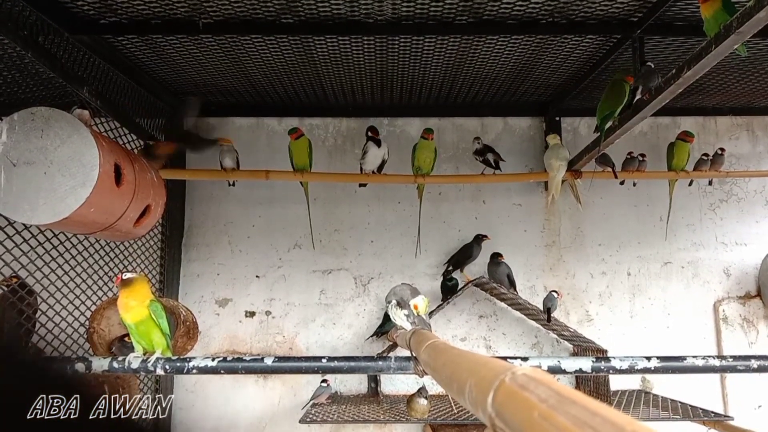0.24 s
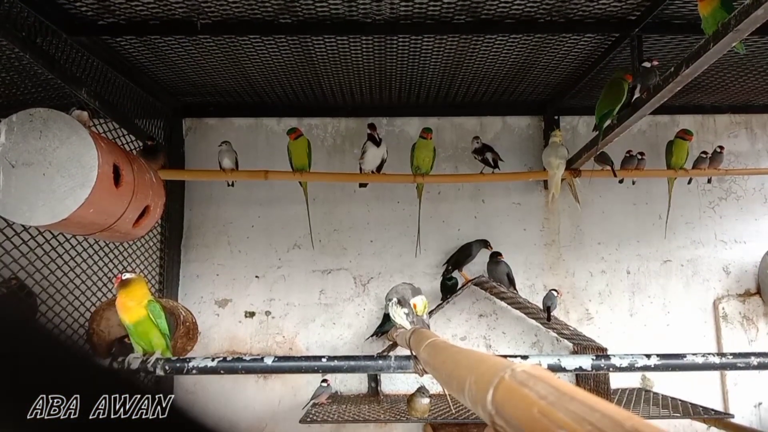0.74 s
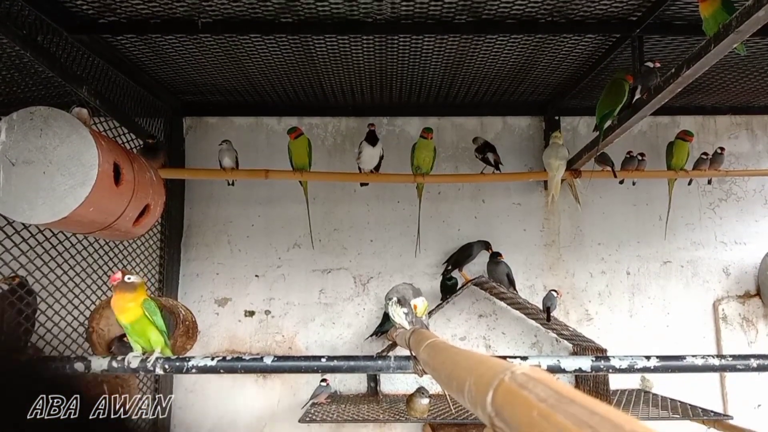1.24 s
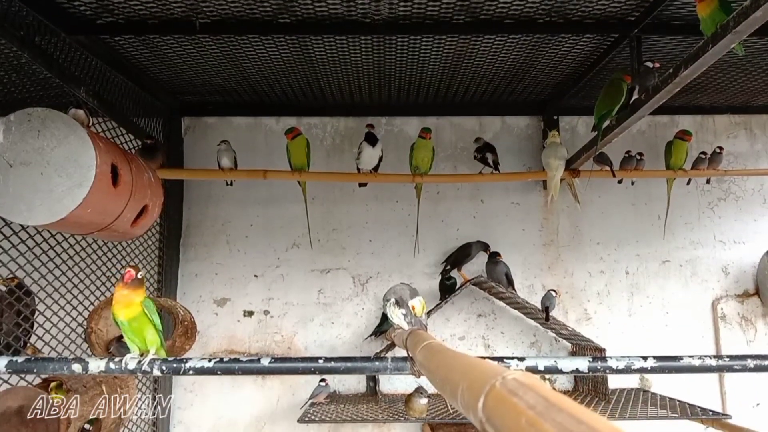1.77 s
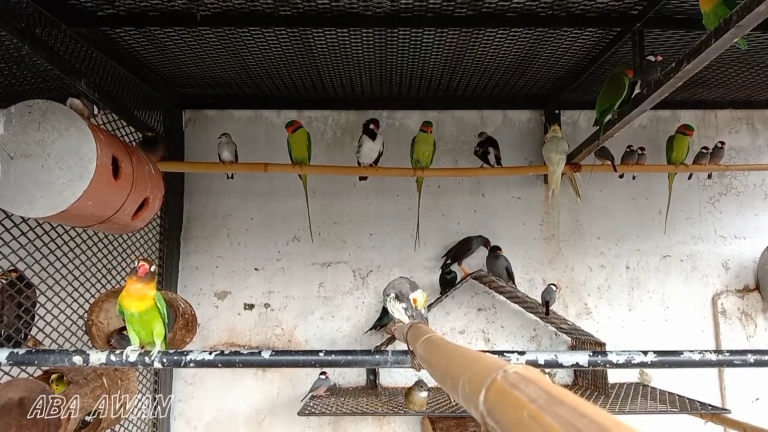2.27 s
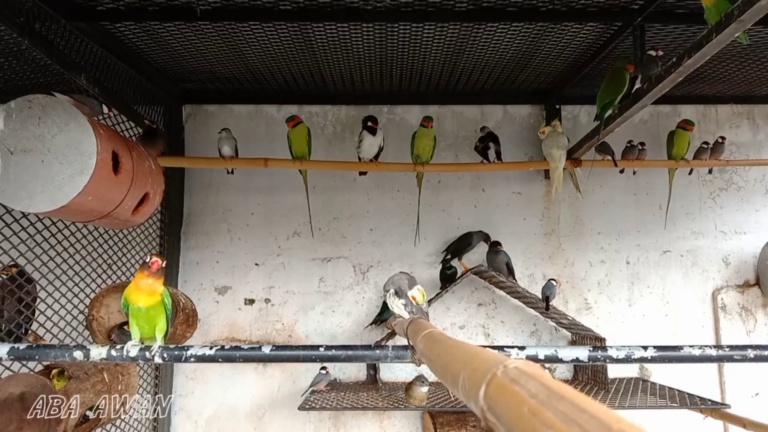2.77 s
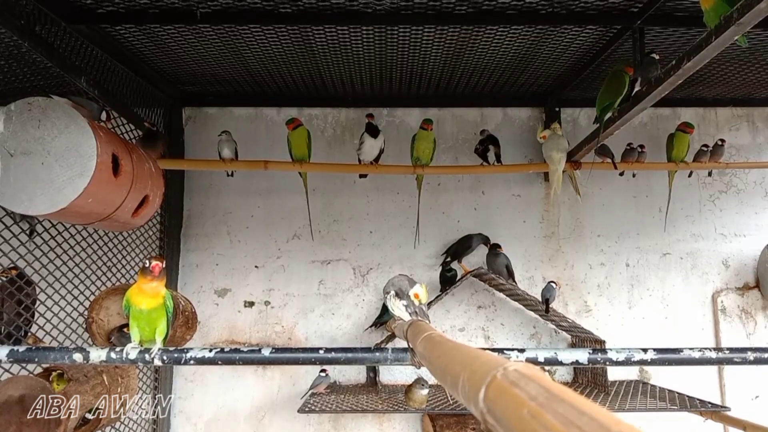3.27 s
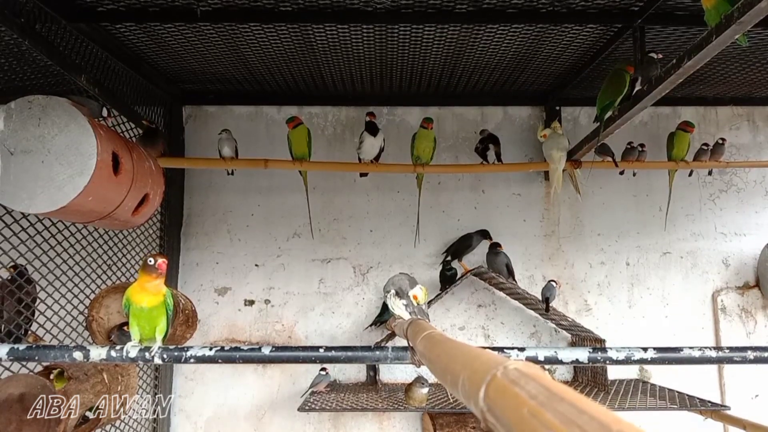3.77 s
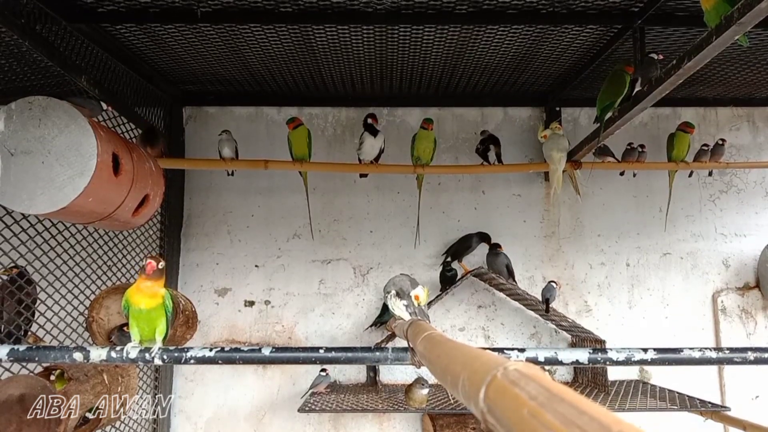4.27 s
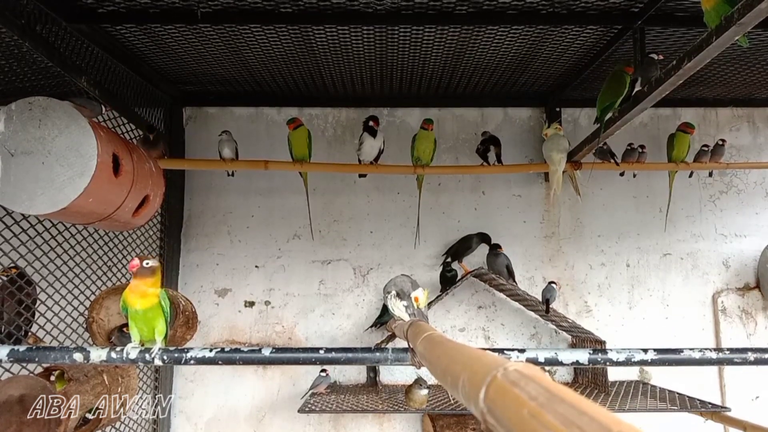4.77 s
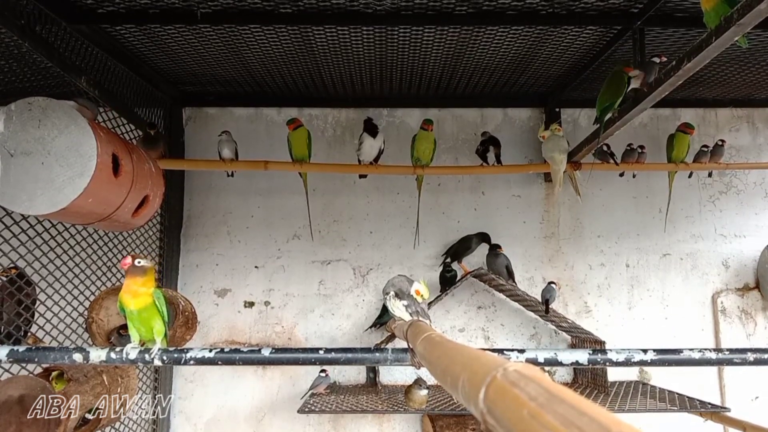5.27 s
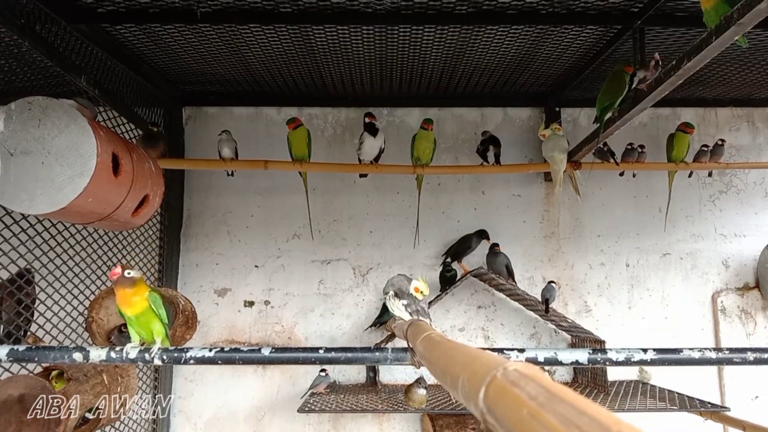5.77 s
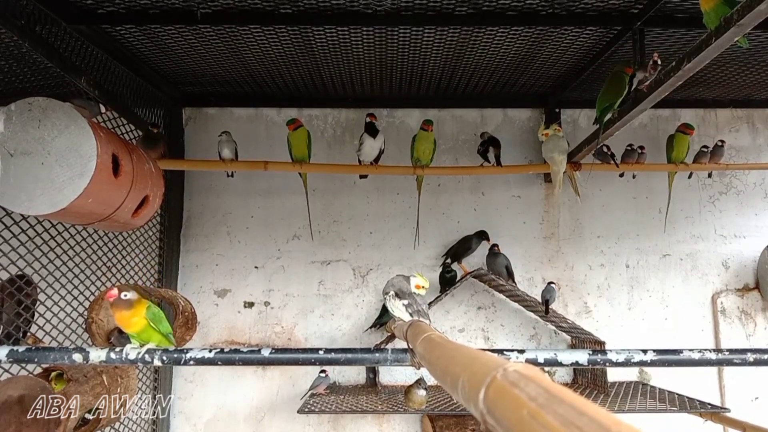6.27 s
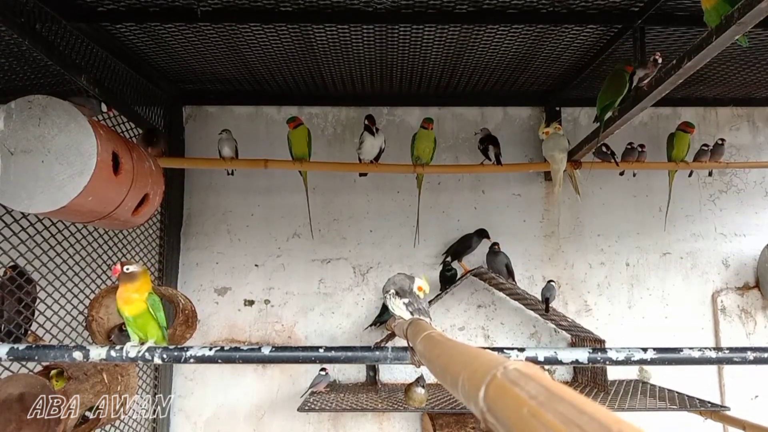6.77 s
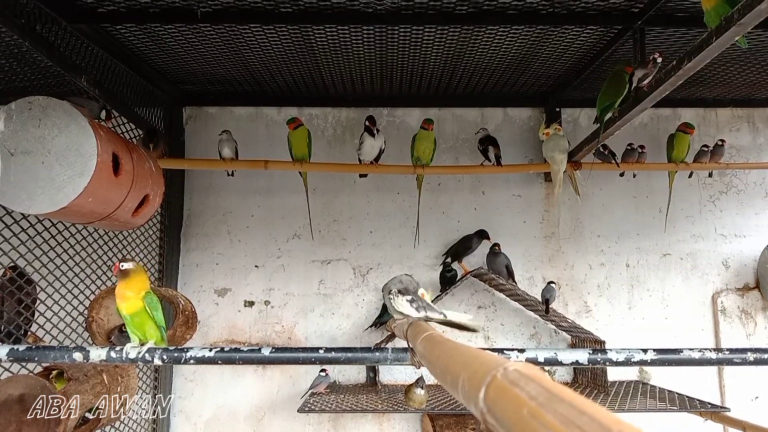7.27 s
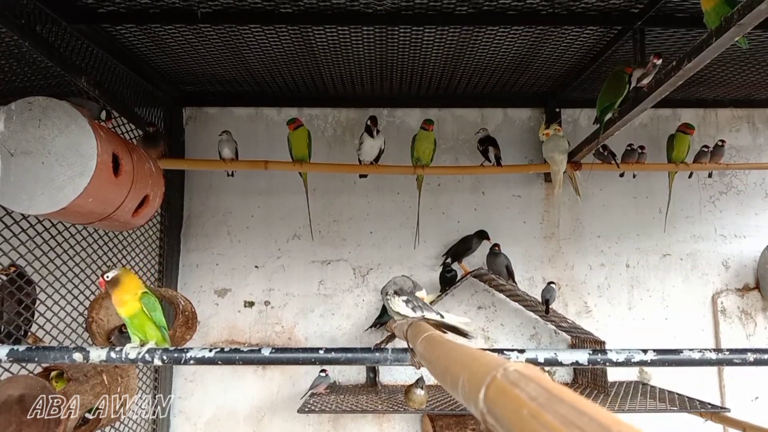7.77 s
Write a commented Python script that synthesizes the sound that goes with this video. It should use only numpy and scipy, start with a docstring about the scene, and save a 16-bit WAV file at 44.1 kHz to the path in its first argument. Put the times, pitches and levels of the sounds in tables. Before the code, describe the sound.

Small parrots and finches shriek, squawk and chip in a hard-walled aviary while one bird twice whistles a long rising and falling note.

```python
"""In a hard-walled aviary small parrots and finches call together: shrieks, squawks, quick chips and hisses.
One bird twice whistles a long note that rises and falls; others warble, muffled, and a dove coos faintly.
Voices are sums of unsteady harmonics weighted by a throat resonance; rasps, ticks and bumps are shaped noise.
Decaying noise serves as the walls' answer to every call, over a low outdoor rumble and a thin ringing tone."""
import sys
import numpy as np
from scipy import signal
from scipy.fft import rfft, irfft, next_fast_len
from scipy.io import wavfile
from scipy.ndimage import uniform_filter1d, minimum_filter1d, map_coordinates

SR = 44100
rng = np.random.default_rng(int(sys.argv[2]) if len(sys.argv) > 2 else 0)


def store_wav(level_fs):
    """Save 16-bit WAV to argv[1]."""
    pcm = np.round(np.clip(np.atleast_2d(level_fs), -1, 1) * 32767)
    wavfile.write(sys.argv[1], SR, pcm.T.astype(np.int16))


N = 354563
TOP_HZ = 15900  # upper band limit

# Throat resonances of the shrill, nasal and distant voices. Each row: frequency in Hz, relative gain in dB.
SHRILL_THROAT = [(1500, -20), (2600, -19.5), (3400, 0.5), (4300, -4.5), (5400, 2), (6400, -2.5),
                 (7800, -11.5), (10500, -15), (13000, -13), (16000, -23.5)]
NASAL_THROAT = [(1000, -11.5), (1600, -1.5), (2400, -2.5), (3300, 6), (4000, -6.5), (5000, 2), (6500, -2),
                (8500, -10), (11000, -14), (16000, -24)]
FAR_THROAT = [(700, 5.5), (3300, -4.5), (5300, -21), (8200, -36.5), (11000, -51.5), (16000, -55)]


def amp(db):
    """Level to amplitude: 20 dB is a factor of ten."""
    return 10 ** (np.asarray(db) / 20)


def unit(x):
    """Normalisation to a root-mean-square of 1."""
    return x / np.sqrt(np.mean(x ** 2) + 1e-20)


def along(points, hz):
    """Interpolation of (Hz, value) points on a logarithmic frequency axis."""
    f, v = np.transpose(points)
    return np.interp(np.log(hz + 1), np.log(f + 1), v)


def wobble(n, rate):
    """Slow random modulation: a smooth curve through Gaussian knots, rate of them a second."""
    knots = rng.standard_normal(int(n * rate / SR) + 4)
    return map_coordinates(knots, [np.arange(n) * rate / SR + 1])


def ease(u):
    """A raised-cosine step from 0 to 1."""
    return np.sin(np.pi / 2 * np.clip(u, 0, 1)) ** 2


def swell(n, rise, fall):
    """A sinusoidal envelope that opens and closes over the given seconds."""
    t = np.arange(n) / SR
    opening = np.sin(np.pi / 2 * np.clip(t / rise, 0, 1))
    closing = np.sin(np.pi / 2 * np.clip((t[-1] - t) / fall, 0, 1))
    return opening * closing


def noise(n, gain_db):
    """Spectral shaping: white noise coloured by a dB function of frequency, with rms 1."""
    spectrum = rfft(rng.standard_normal(n))
    return unit(irfft(spectrum * amp(gain_db(np.fft.rfftfreq(n, 1 / SR))), n))


def add(track, s, sound):
    """Superposition: mix a sound into the track at time s in seconds."""
    part = track[max(round(s * SR), 0):][:len(sound)]
    part += sound[:len(part)]


def walls(x):
    """Diffuse reverberation: convolution with decaying noise, whose treble dies soonest."""
    # Each row: frequency in Hz, time for a 60 dB decay in seconds.
    decay_times = [(200, 0.31), (1500, 0.36), (5000, 0.27), (10000, 0.27), (16000, 0.12)]
    hz, t, bands = signal.stft(rng.standard_normal(SR * 3 // 4), SR, nperseg=256)
    decay = amp(-60 * t / along(decay_times, hz)[:, None])
    tail = signal.istft(bands * decay, SR, nperseg=256)[1]
    tail = tail * swell(len(tail), 0.0009, 0.044)
    return signal.fftconvolve(x, tail / np.linalg.norm(tail))[:N]


def placed(x, direct_db, room_db):
    """The direct-to-reverberant ratio: a source heard straight and by way of the walls."""
    return amp(direct_db) * x + amp(room_db) * walls(x)


def syrinx(pitch, throat, rough, jitter, jitter_rate=520, shimmer_db=9, shimmer_rate=380):
    """Source and filter: harmonics of an unsteady membrane, each weighted by the throat as it sweeps."""
    n = len(pitch)
    shaky = pitch * (1 + jitter * rough * wobble(n, jitter_rate))
    phase = 2 * np.pi * np.cumsum(shaky) / SR
    k = np.arange(1, 13)[:, None]  # harmonic numbers
    gains = amp(along(throat, k * np.abs(shaky))) * (k * shaky < TOP_HZ)
    flicker = amp(shimmer_db * rough * np.array([wobble(n, shimmer_rate) for _ in k]))
    partials = np.sin(k * phase + rng.uniform(0, 2 * np.pi, k.shape))
    return unit(np.sum(gains * flicker * partials, axis=0))


def calls(table, throat, settle, rise, fall, air_db, quaver, quaver_rate, jitter):
    """Exponential pitch glides; rough calls quaver and push turbulent air through the throat.

    Each row: start and length in seconds, start and settled pitch in Hz, level in dB, roughness 0-1.
    settle, rise and fall are shares of the call's length."""
    track = np.zeros(N)
    for s, length, start, end, db, rough in table:
        n = int(length * SR)
        scoop = 1 - np.exp(-np.linspace(0, 1, n) / settle)
        aim = start + (end - start) * scoop / scoop[-1]
        pitch = aim * (1 + quaver * rough * wobble(n, quaver_rate))
        # the air noise is weak below the voice's own pitch
        air = noise(n, lambda hz: along(throat, hz) - 40 * (hz < .8 * aim.mean()))
        voice = syrinx(pitch, throat, rough, jitter) + amp(air_db) * rough * air
        add(track, s, amp(db) * unit(voice * swell(n, rise * length, fall * length)))
    return track


def roughened(table, rough, pitch_law=0., at_hz=1550):
    """Roughness as a power law of pitch: a positive law makes higher calls cleaner."""
    return [(*row, min(rough * (at_hz / row[3]) ** pitch_law, 1)) for row in table]


def outdoors(level_db=-56):
    """Broadband ambient noise, mostly low, under a slow random amplitude modulation."""
    # Each row: frequency in Hz, relative gain in dB.
    floor = [(15, -90), (25, -11.5), (102, 8.5), (229, -1), (427, 0), (591, -1), (1610, -9), (2160, -33),
             (3080, -32), (4140, -51), (5430, -16), (7310, -25), (8140, -6.5), (11300, -34.5), (16000, -77)]
    return noise(N, lambda hz: along(floor, hz)) * amp(level_db + 2.8 * wobble(N, 4))


def thin_tone():
    """Narrow spectral lines share one envelope, which rises and decays exponentially."""
    # The ringing lines. Each row: frequency in Hz, relative level in dB.
    line_rows = [(3138, 0.5), (3921, -14.5), (4706, -17)]
    # The swells. Each row: time of the crest in seconds, relative level in dB.
    crests = [(.1, -45.5), (.92, -38.5), (1.52, -40.5), (2.3, -45.5), (2.72, -42), (3, -41)]
    rise_db_per_s, fall_db_per_s = 83, 132
    t = np.arange(N) / SR
    lines = np.zeros(N)
    for hz, db in line_rows:
        level = amp(db + 1.7 * wobble(N, 7.22))
        lines += level * np.sin(2 * np.pi * hz * t + 0.7 * wobble(N, 27))
    swells = np.zeros(N)
    for s, db in crests:
        swells += amp(db - np.maximum(rise_db_per_s * (s - t), fall_db_per_s * (t - s)))
    return unit(lines) * swells


def bumps(slope_db=34):
    """Band-limited noise: dull bass swells that lose slope_db an octave either side of their centre."""
    # Each row: start and length in seconds, centre in Hz, level in dB.
    bump_rows = [(0.702, 0.3, 94, -52.5), (2.525, 0.096, 93, -49), (3.246, 0.25, 99, -54),
                 (4.183, 0.082, 143, -49), (6.502, 0.54, 92, -52.5), (7.788, 0.07, 163.5, -40)]
    track = np.zeros(N)
    for s, length, centre, db in bump_rows:
        n = int(length * SR)
        thud = noise(n, lambda hz: -slope_db * np.abs(np.log2((hz + 1) / centre)))
        add(track, s, amp(db) * unit(thud * swell(n, length / 2, length / 2)))
    return track


def flock(count=120, level_db=-53, centre_hz=1600):
    """Random superposition: faint notes scattered evenly in time, log-normal in pitch and length."""
    rows = []
    times = rng.uniform(0, N / SR, count)
    for when, (size, height, bend, loud) in zip(times, rng.standard_normal((count, 4))):
        length = 0.11 * np.exp(0.41 * size)
        hz = centre_hz * np.exp(0.37 * height)
        rows.append((when, length, hz * (1 + 0.078 * bend), hz, level_db + 3 * loud, .35))
    return calls(rows, FAR_THROAT, settle=0.18, rise=0.46, fall=0.42, air_db=-14.5,
                 quaver=.1, quaver_rate=100, jitter=0.018)


def dove():
    """Near-sinusoidal low notes with random frequency and amplitude modulation, a tremble."""
    # Each row: start and length in seconds, mean pitch in Hz, relative level in dB.
    coos = [(3.833, 0.057, 307, -45), (3.937, 0.065, 308, -54), (4.075, 0.098, 334, -50.5),
            (6.797, 0.23, 321, -50.5), (7.094, 0.18, 316, -50)]
    track = np.zeros(N)
    for s, length, hz, db in coos:
        n = int(length * SR)
        phase = 2 * np.pi * np.cumsum(hz * (1 + .04 * wobble(n, 40))) / SR
        tremor = amp(5 * wobble(n, 45))
        add(track, s, amp(db) * unit(np.sin(phase) * tremor * swell(n, 0.044, 0.043)))
    return placed(track, direct_db=1.5, room_db=-1.0)


def ticks(t60=0.012, gain_db=-6):
    """Impact noise with exponential decay: tiny bright clicks, as of a beak on seed or wire."""
    # Each row: start in seconds, relative peak level in dB.
    tick_rows = [(0.2662, -24.5), (2.501, -34.5), (2.7037, -24.5), (2.755, -26), (2.7995, -33),
                 (2.8447, -34), (3.211, -30), (3.2452, -20), (3.3658, -23)]
    colour = [(1500, 0.5), (7000, 8.5), (16000, -32.5)]  # (Hz, dB)
    track = np.zeros(N)
    t = np.arange(SR // 20) / SR
    for s, db in tick_rows:
        click = noise(len(t), lambda hz: along(colour, hz))
        add(track, s, amp(db + gain_db - 60 * t / t60) * click)
    return placed(track, direct_db=-1, room_db=2.5)


def rasps():
    """Turbulence noise: harsh, fluttering bursts of air without a pitch."""
    # Each row: start and length in seconds, relative level in dB, spectral tilt in dB per octave.
    rasp_rows = [(0.499, 0.021, -36, 18.5), (2.555, 0.062, -30.5, 7), (3.217, 0.18, -40, 0),
                 (5.052, 0.078, -29, 4), (5.453, 0.07, -27.5, 4), (5.667, 0.069, -32.5, 2.5),
                 (5.902, 0.054, -33, 1), (6.096, 0.1, -33.5, 2)]
    # Each row: frequency in Hz, relative gain in dB.
    throat = [(700, -16.5), (1400, -3.5), (2700, 6.5), (4000, -2), (5400, -0.5), (8000, -18.5),
              (11000, -34), (14500, -31.5), (16000, -30.5)]
    track = np.zeros(N)
    for s, length, db, tilt_db in rasp_rows:
        n = int(length * SR)
        air = noise(n, lambda hz: along(throat, hz) + tilt_db * np.log2((hz + 1) / 3000))
        flutter = amp(2.5 * wobble(n, 220))
        add(track, s, amp(db) * unit(air * flutter * swell(n, length / 2, length / 2)))
    return placed(track, direct_db=1.5, room_db=-0.5)


def warbles():
    """Low-pass filtering by the throat curve gives muffled glides that are nearly linear in pitch."""
    # Each row: start and length in seconds, start and end pitch in Hz, relative level in dB.
    warble_rows = [ (.11, 0.041, 3103, 2405, -31.5), (.24, 0.056, 3390, 2596, -29.5),
                   (.615, 0.054, 3120, 2433, -35.5), (.735, 0.11, 3210, 2083, -43.5),
                   (1.528, 0.026, 2390, 2354, -34), (2.775, 0.2, 1972, 3404, -33),
                   (3.19, 0.058, 1950, 2660, -40), (3.27, .13, 2824, 3273, -30.5),
                   (3.47, 0.083, 813, 825, -44), (3.76, .14, 1243, 887, -42.5),
                   (4.16, 0.12, 1863, 2068, -40.5), (4.585, 0.021, 3420, 3260, -28),
                   (5.11, 0.1, 2467, 2258, -31.5), (5.255, 0.045, 3250, 3295, -25),
                   (5.37, 0.089, 2726, 3235, -25), (5.6, 0.064, 2800, 3460, -31.5),
                   (5.89, 0.039, 3250, 2853, -28.5), (7.32, 0.05, 4160, 4780, -42),
                   (7.678, 0.034, 3900, 2840, -38)]
    track = calls(roughened(warble_rows, rough=0.44), FAR_THROAT, settle=1.3, rise=0.14, fall=0.041,
                  air_db=-7, quaver=.12, quaver_rate=140, jitter=.062)
    return placed(track, direct_db=-1.0, room_db=-3.0)


def peeps():
    """A throat that favours the fundamental and little roughness leave soft, nearly pure tones."""
    # Each row: start and length in seconds, start and settled pitch in Hz, relative level in dB.
    peep_rows = [(2.26, 0.073, 1685, 1670, -56.5), (2.29, .04, 2475, 2487, -58),
                 (4.535, 0.059, 2960, 2670, -33.5), (4.735, 0.054, 2530, 2657, -36.5),
                 (4.835, 0.043, 3640, 3160, -37), (6.338, 0.1215, 2856, 2714, -27),
                 (6.558, 0.12, 2714, 2697, -24.5)]
    # Each row: frequency in Hz, relative gain in dB.
    throat = [(700, 32.5), (3300, -8.5), (5300, -11.5), (8200, -22.5), (11000, -55), (16000, -53.5)]
    track = calls(roughened(peep_rows, rough=0.053), throat, settle=0.38, rise=0.052, fall=0.27,
                  air_db=-6, quaver=0.11, quaver_rate=98.8, jitter=0.1)
    return placed(track, direct_db=5.5, room_db=1.0)


def clucks():
    """Strong jitter and air noise in a low-passing throat make hoarse low clucks."""
    # Each row: start and length in seconds, start and settled pitch in Hz, relative level in dB.
    cluck_rows = [(1.352, .075, 1572, 1334, -30), (1.66, 0.054, 1695, 1424, -31),
                  (1.94, 0.1, 1900, 2062, -36)]
    # Each row: frequency in Hz, relative gain in dB.
    throat = [(1000, -6), (1400, -8), (2100, -14.5), (3000, -30.5), (6000, -56)]
    track = calls(roughened(cluck_rows, rough=0.58), throat, settle=0.42, rise=1.0, fall=.5,
                  air_db=3.0, quaver=0.057, quaver_rate=240, jitter=.06)
    return placed(track, direct_db=0.5, room_db=-1)


def slurs():
    """An upward frequency glide under a slow rise in amplitude: one long, swelling slur."""
    # Each row: start and length in seconds, start and settled pitch in Hz, relative level in dB.
    slur_rows = [(7.70, .3, 1110, 1718, -28)]
    # Each row: frequency in Hz, relative gain in dB.
    throat = [(1500, -15.5), (2600, 2.5), (3400, 1.5), (4800, -20.5), (5600, -9), (6800, -32), (8300, -14),
              (11000, -44), (16000, -54)]
    track = calls(roughened(slur_rows, rough=0.065), throat, settle=.22, rise=0.48, fall=0.15,
                  air_db=9, quaver=0.041, quaver_rate=110, jitter=0.13)
    return placed(track, direct_db=0.5, room_db=-1.5)


def sweeps():
    """Near-linear downward frequency glides through the nasal throat, with little roughness."""
    # Each row: start and length in seconds, start and end pitch in Hz, relative level in dB.
    sweep_rows = [(1.995, 0.053, 3684, 3200, -28.5), (4.32, .125, 1758, 1193, -29.5),
                  (6.302, 0.033, 3510, 2875, -30.5)]
    track = calls(roughened(sweep_rows, rough=0.27), NASAL_THROAT, settle=3.3, rise=0.2, fall=.25,
                  air_db=0, quaver=.06, quaver_rate=130, jitter=0.045)
    return placed(track, direct_db=0.0, room_db=-0.5)


def squawks():
    """Nasal resonances colour parrot squawks whose roughness lessens with pitch."""
    # Each row: start and length in seconds, start and settled pitch in Hz, relative level in dB.
    squawk_rows = [ (.295, .075, 1225, 1559, -25), (.418, 0.049, 2236, 2410, -27.5),
                   (.483, .054, 1307, 1908, -26), (1.795, 0.04, 1330, 1490, -41),
                   (1.905, .046, 1066, 1157, -37.5), (2.105, 0.046, 1490, 1455, -35.5),
                   (4.95, .11, 1827, 1957, -38.5), (5.058, 0.048, 1987, 2216, -29.5),
                   (6.172, .062, 1712, 1810, -29.5), (6.25, .036, 3540, 2900, -25.5),
                   (7.912, 0.072, 2163, 2430, -24)]
    track = calls(roughened(squawk_rows, rough=0.451, pitch_law=1.24), NASAL_THROAT, settle=.35,
                  rise=0.22, fall=0.11, air_db=3, quaver=0.0613, quaver_rate=130, jitter=0.046)
    return placed(track, direct_db=3.0, room_db=-2)


def snaps():
    """Irregular vibration: the shrieking voice cracks in snaps, all equally brief and rough."""
    # Each row: start in seconds, middle pitch in Hz, upward bend either side as a share of it,
    # relative level in dB.
    snap_rows = [(1.237, 2693, -0.13, -11.5), (1.321, 2745, .08, -18.5), (3.596, 2820, -0.033, -10.5),
                 (3.683, 2470, .09, -13), (3.899, 2787, 0.046, -11), (3.945, 2640, 0.085, -11.5),
                 (4.039, 2730, .12, -14.5), (6.277, 2350, -0.13, -15), (7.956, 2620, 0.033, -11.5)]
    length_s, rough = .015, 0.492
    rows = [(s, length_s, hz * (1 - bend), hz * (1 + bend), db, rough) for s, hz, bend, db in snap_rows]
    track = calls(rows, SHRILL_THROAT, settle=0.77, rise=0.19, fall=0.67, air_db=-6.0,
                  quaver=.08, quaver_rate=197, jitter=0.07)
    return placed(track, direct_db=-4.5, room_db=-4.5)


def shrieks():
    """High resonances reinforce the upper harmonics of loud, shrill shrieks."""
    # Each row: start and length in seconds, start and settled pitch in Hz, relative level in dB,
    # roughness 0-1.
    shriek_rows = [ (1.009, 0.036, 2470, 3300, -14.5, 0.4), (1.038, .075, 3530, 2983, -14.5, .3),
                   (1.095, .081, 3580, 4257, -21, 0.5), (1.222, 0.018, 3270, 3110, -21.5, 0.3),
                   (1.944, 0.036, 2773, 2544, -19, .2), (3.407, .032, 2460, 2770, -15, .05),
                   (3.527, 0.083, 3490, 2995, -17, .3), (3.699, 0.03, 2850, 2453, -15.5, 0.3),
                   (3.815, 0.037, 2365, 2540, -14, .7), (3.863, 0.028, 2483, 2630, -14.5, .6),
                   (3.995, .047, 3000, 3180, -17.5, .45), (8.0, .036, 2467, 2780, -10.5, 0.4)]
    track = calls(shriek_rows, SHRILL_THROAT, settle=0.28, rise=0.31, fall=0.33, air_db=-7.5,
                  quaver=0.0696, quaver_rate=200, jitter=.064)
    return placed(track, direct_db=-3, room_db=-4.5)


def parrots():
    """Superposition of the kinds of call, each with its own glide, roughness and room share."""
    shrill = shrieks() + snaps()
    nasal = squawks() + sweeps()
    return shrill + nasal + peeps() + slurs() + clucks() + warbles()


def chips(table, throat, shape, rough, gain_db, stray):
    """Time scaling: every chip is a stretched copy of one shape of (s from onset, pitch ratio, dB)."""
    track = np.zeros(N)
    stretches = np.exp(0.18 * rng.standard_normal(len(table)))
    for (s, db, hz), stretch in zip(table, stretches):
        times, ratio, level = np.transpose(shape)
        times = times * stretch
        t = np.arange(times[0], times[-1], 1 / SR)
        effort = amp(db + gain_db + np.interp(t, times, level)) * signal.windows.tukey(len(t), .3)
        # the second harmonic is the one that carries
        pitch = hz / 2 * np.interp(t, times, ratio) * (1 + stray * wobble(len(t), 220))
        add(track, s + t[0], effort * syrinx(pitch, throat, rough, jitter=0.096))
    return track


def twitter():
    """A power-law fade in dB: rows (s, dB, Hz) of the quick run on one pitch, fading ever faster."""
    # The onsets in seconds.
    onsets = [6.46, 6.544, 6.622, 6.699, 6.766, 6.833, 6.898, 6.97, 7.068]
    hz, first_db, fade_db, fade_power = 5790, -5, 14, 1.64
    progress = (np.array(onsets) - min(onsets)) / np.ptp(onsets)
    return [(s, first_db - fade_db * u ** fade_power, hz) for s, u in zip(onsets, progress)]


def finches():
    """Rapid frequency modulation: chips flick up and fall to a short held note; the twitter is brief flicks."""
    # The slow run. Each row: onset in seconds, relative level in dB, second harmonic in Hz.
    chip_rows = [(4.2674, -3.5, 5540), (4.4535, -6, 5660), (4.514, -2, 4964), (4.6603, 1, 5467),
                 (4.7767, 0, 5404), (4.8858, -3, 5550), (4.9939, -6.5, 5430), (5.0948, -2, 5730),
                 (5.182, -4, 5200), (5.2956, -1.5, 5040)]
    # Throats of the slow and the quick run. Each row: frequency in Hz, relative gain in dB.
    slow_throat = [(2000, -39), (3500, -41), (4500, -15), (5200, 7.5), (6300, 1), (7500, -29), (9000, -26),
                   (10500, -7), (12000, -16), (13500, -26), (16000, -23.5)]
    quick_throat = [(2800, -12), (4200, -25), (5500, 4.5), (6200, 1.5), (7500, -24), (11000, -32),
                    (13000, -37), (15000, -34)]
    chip = [(-.008, 0.9, -18), (-.003, 1.3, -9.5), (0, 1.15, -5.5), (.004, .96, 1),
            (.011, 1.02, -2.5), (.021, .98, -8), (.034, 0.83, -26)]
    flick = [(-.007, 1.08, -12), (0, 0.94, -5.5), (.006, 1, 1), (.012, .95, -8.5), (.018, 1.1, -15.5)]
    slow = chips(chip_rows, slow_throat, chip, rough=0.41, gain_db=-9.5, stray=0.029)
    quick = chips(twitter(), quick_throat, flick, rough=0.49, gain_db=-11.5, stray=0.0084)
    return placed(slow, direct_db=1.5, room_db=-3) + placed(quick, direct_db=3.5, room_db=-4.5)


def whistler(waver_db=0.95):
    """A frequency-modulated pure tone climbs, turns and falls; throat resonance ties loudness to pitch."""
    # Each row: start, climb, hold and fall in seconds, start, top and end pitch in Hz, # lag of the climb as a
    # power, relative level in dB, # brief level change just after the turn in dB, dip or boost, as the voice
    # catches at the turn.
    notes = [(4.459, .35, .052, 0.2, 1102, 1798, 994, 0.95, -14, -14),
             (6.764, .36, .093, .24, 1080, 1915, 892, 1.7, -10.5, 3.5)]
    # The throat favours the middle of the range. Each row: frequency in Hz, relative gain in dB.
    throat = [(850, -15.5), (1000, -18.5), (1170, -2.5), (1300, -1), (1600, -1), (1900, -7.5)]
    turn_after_s, turn_width_s = 0.024, 0.011  # delay and width of the level change after the turn
    creep_hz_per_s, tire_db_per_s = 930, 7.5  # the held top creeps up; each note tires as it goes
    track = np.zeros(N)
    for s, climb, hold, fall, start, top, end, lag, db, turn_db in notes:
        turn = climb + hold
        t = np.arange(0, turn + fall, 1 / SR)
        aim = top - creep_hz_per_s * np.maximum(turn - t, 0)
        rising = (aim - start) * ease((t / climb) ** lag)
        falling = (end - top) * ease((t - turn) / fall)
        pitch = start + rising + falling
        level_change = turn_db * np.exp(-((t - turn - turn_after_s) / turn_width_s) ** 2)
        waver = waver_db * wobble(len(t), 33.8)
        level = db - tire_db_per_s * t + along(throat, pitch) + level_change + waver
        shaky = pitch * (1 + 0.0071 * wobble(len(t), 89.4))
        tone = unit(np.sin(2 * np.pi * np.cumsum(shaky) / SR))
        add(track, s, tone * amp(level) * swell(len(t), 0.093, 0.014))
    return placed(track, direct_db=1.0, room_db=-10.0)


def scene():
    """Linear superposition of background and birds; the flock is heard only by way of the walls."""
    background = outdoors() + thin_tone() + bumps() + walls(flock())
    birds = dove() + ticks() + rasps() + parrots() + finches() + whistler()
    return (background + birds)[None]


def record(dry):
    """Peak limiting by a smoothed gain, then a sharp low-pass at the band limit."""
    ceiling = .72  # amplitude at which the limiter begins to duck
    needed = ceiling / np.maximum(np.abs(dry), ceiling)
    gain = uniform_filter1d(minimum_filter1d(needed, size=256), size=256)
    m = next_fast_len(N + SR // 2)
    passband = np.fft.rfftfreq(m, 1 / SR) < TOP_HZ
    return irfft(rfft(dry * gain, m) * passband, m)[..., :N]


dry = scene()
out = record(dry)
store_wav(out)
```